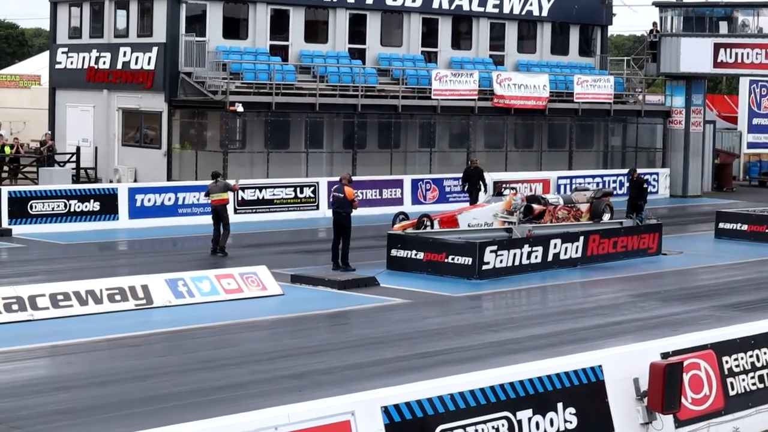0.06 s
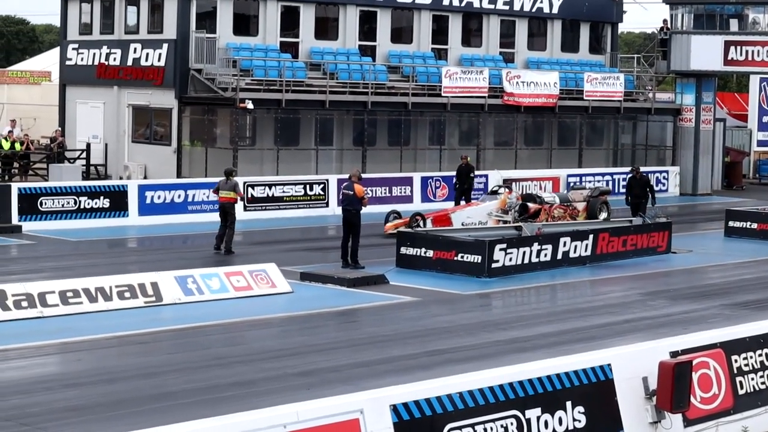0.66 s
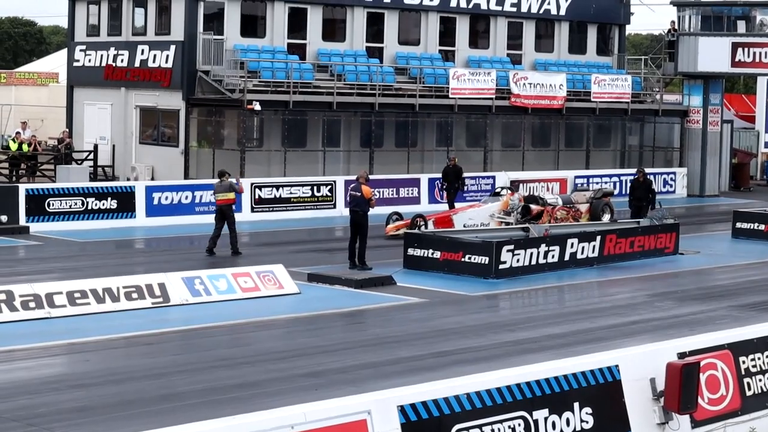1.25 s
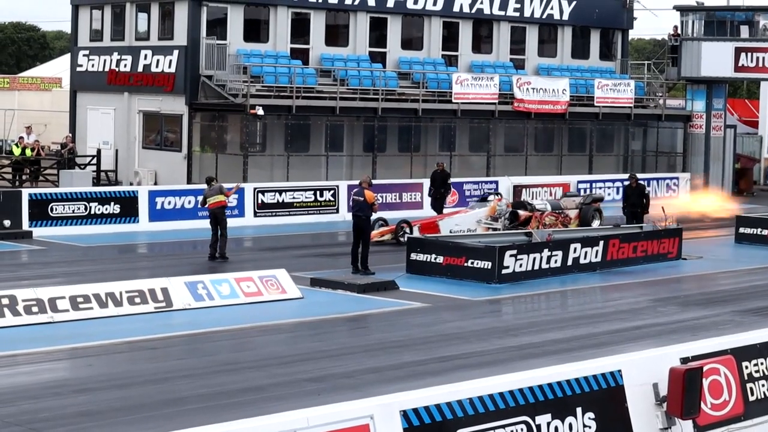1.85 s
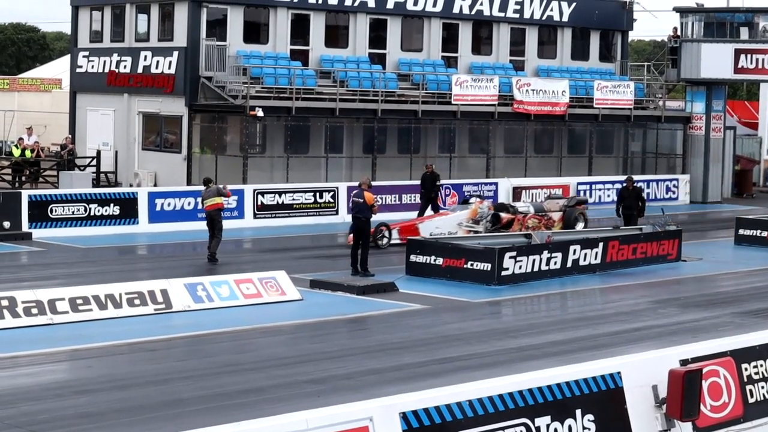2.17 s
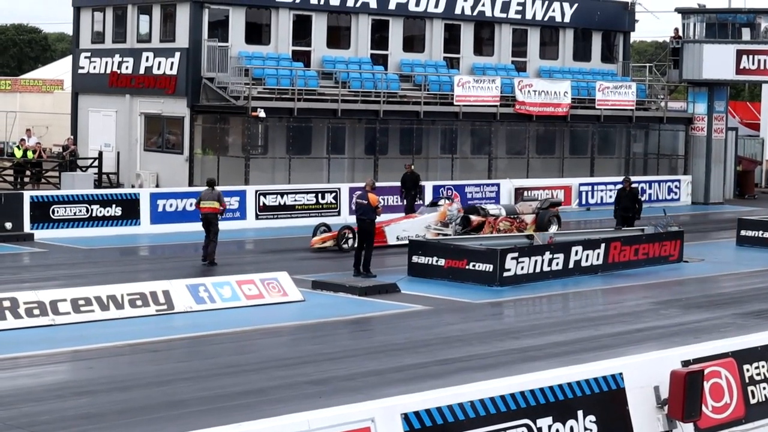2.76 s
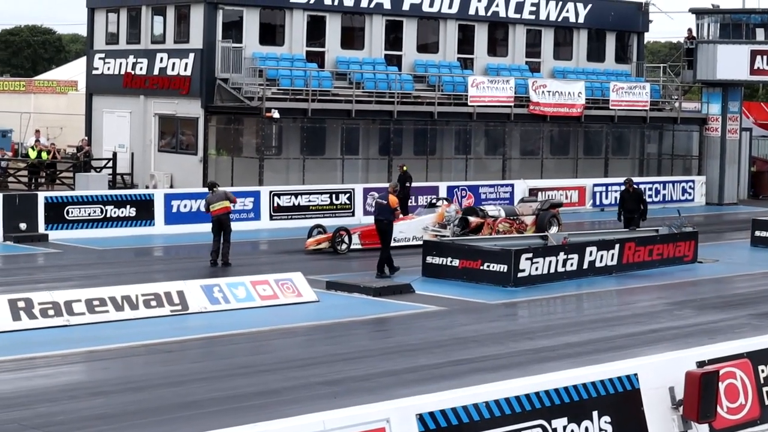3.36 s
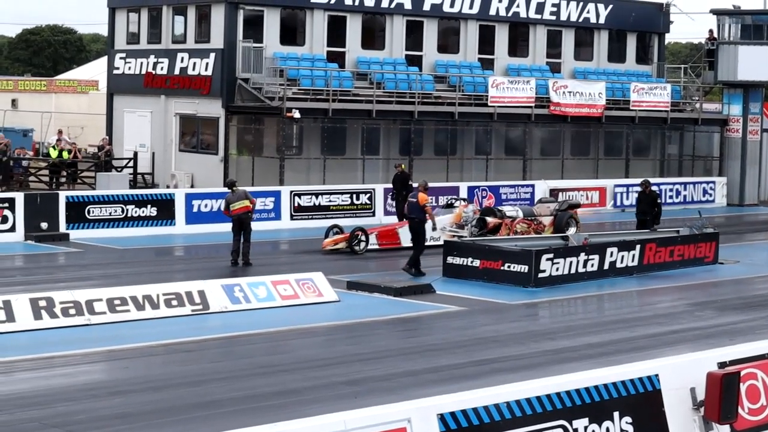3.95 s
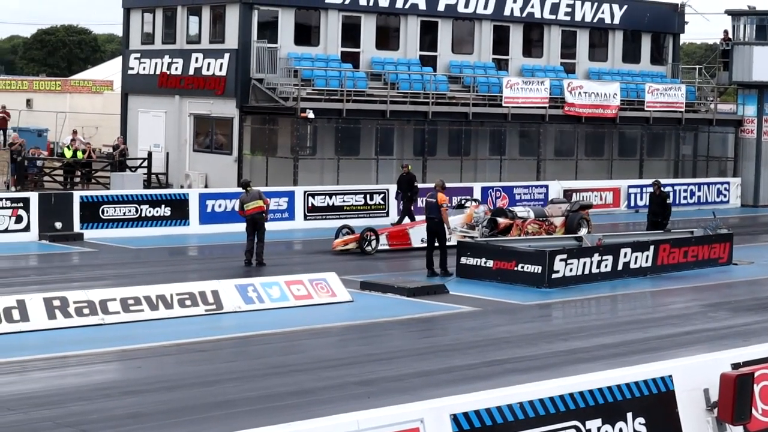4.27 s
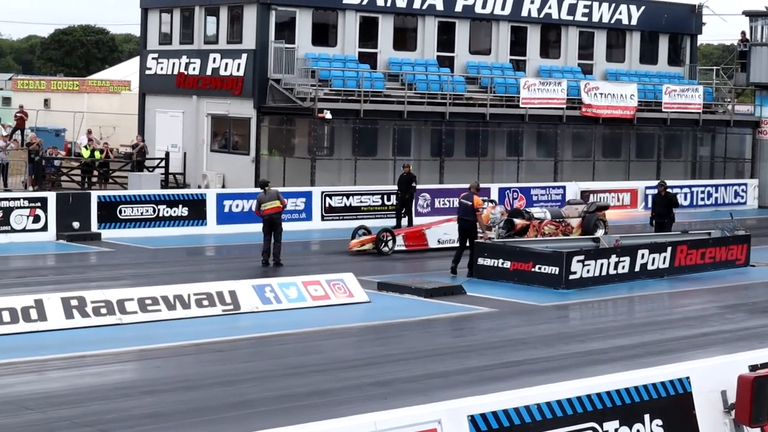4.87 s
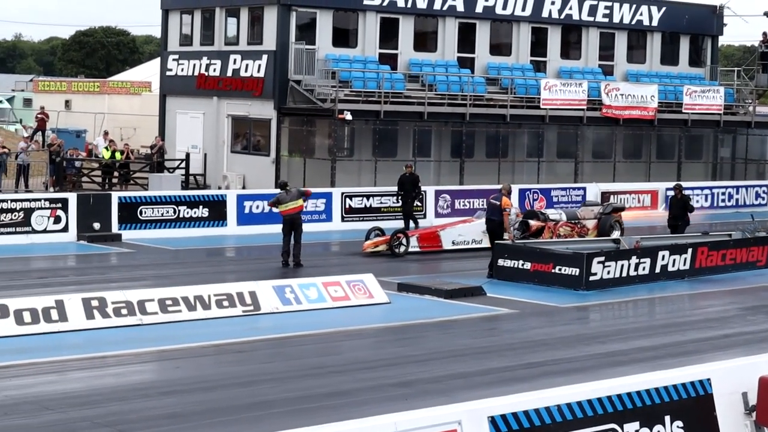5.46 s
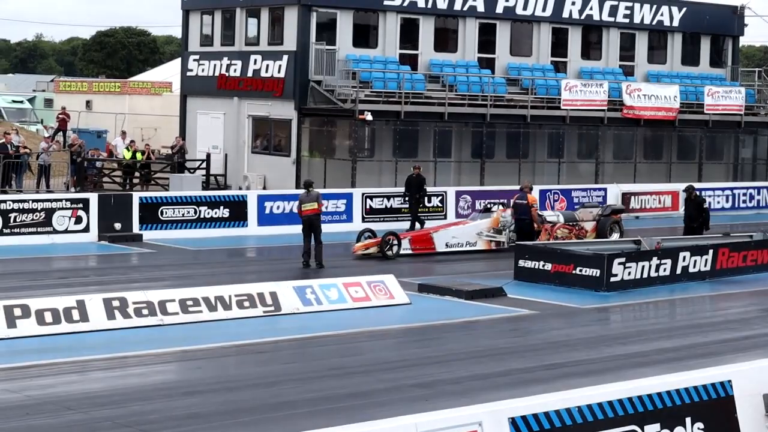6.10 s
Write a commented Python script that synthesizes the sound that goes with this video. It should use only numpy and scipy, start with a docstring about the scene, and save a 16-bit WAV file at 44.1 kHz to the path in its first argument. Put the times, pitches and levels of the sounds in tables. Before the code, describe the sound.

A jet engine whines over a low rumble while its afterburner fires in sudden pops and roars, dragging the pitch down each time.

```python
"""A jet dragster idles before a grandstand: blade tones whine over intake hiss and exhaust rumble as an
afterburner roar dies away. From 1 s, fuel lights in two short burns and a long one; each slows the shaft,
so the whine sinks and then recovers. After 3 s, air bumps softly against the microphone. Near 4, 5 and
5.5 s three more burns roar and crackle, lit with the hardest thumps, which the stand and far walls
reflect."""
import sys
import numpy as np
from scipy import signal
from scipy.fft import rfft, irfft, next_fast_len
from scipy.io import wavfile

SR = 44100
rng = np.random.default_rng(int(sys.argv[2]) if len(sys.argv) > 2 else 0)


def master(y):
    """Save y as 16-bit WAV."""
    cut = np.clip(np.atleast_2d(y).T, -1, 1)
    pcm = np.round(cut * 32767)  # scale
    wavfile.write(sys.argv[1], SR, pcm.astype(np.int16))


N = 270333
TIME = np.arange(N) / SR

# blade tone, swelling and fading in the moving air: (time [s], level [dB])
WHINE_LEVEL = [(0.0, -31.5), (0.38, -25.5), (0.68, -39), (0.95, -25), (1.07, -29), (1.09, -33.5),
               (1.74, -28), (1.91, -41), (2.01, -21), (2.06, -36), (2.94, -22), (2.97, -34), (3.16, -18),
               (3.19, -28.5), (3.31, -15), (3.74, -20.5), (3.86, -14), (4.22, -38.5), (4.4, -20),
               (4.61, -30), (4.68, -22), (4.8, -25), (4.9, -18.5), (5.07, -34.5), (5.36, -21),
               (5.46, -39.5), (5.57, -22.5), (5.86, -37.5), (6.06, -25.5), (6.13, -45)]
# overtones of the blade tone: (time [s], relative level [dB])
OVERTONE_LEVEL = [(0.03, -37), (0.06, -51), (0.4, -48.5), (0.72, -49), (0.81, -43), (1.31, -53),
                  (1.87, -49), (2.07, -53.5), (3.39, -39), (4.24, -48.5), (4.37, -42), (4.8, -45.5),
                  (4.88, -32), (5.05, -49), (5.61, -42.5), (6.1, -47.5)]
# inflow noise, which sets the hiss and the faint tones: (time [s], relative level [dB])
INFLOW_LEVEL = [(0.03, -43), (0.69, -47.5), (1.08, -40), (1.11, -47), (2.01, -44), (2.14, -48.5),
                (2.43, -42), (2.53, -46), (3.58, -38), (4.78, -41.5), (4.86, -36), (5.03, -41.5),
                (5.37, -41.5), (5.51, -44.5), (5.52, -38), (6.1, -42)]
# tones of uneven blades: (multiple of the shaft rate [1], level relative to the inflow [dB])
SHAFT_HARMONICS = [(9, -5.5), (15, -6), (17, -13), (19, -33), (21, -28), (31, -15), (33, -12.5), (36, -27),
                   (66, -31)]
# intake hiss: (frequency [Hz], relative spectral density [dB])
HISS_SPECTRUM = [(1200, -8.5), (2800, -2), (4300, 2), (5100, 2), (5850, -9), (6450, 0), (7050, -3.5),
                 (7750, -18), (8900, -13), (9900, -19.5), (10800, -13), (12600, -13), (14600, -13),
                 (15800, -29)]
# exhaust rumble: (time [s], level [dB])
EXHAUST_LEVEL = [(0, -36.5), (1.0, -30.5), (2.6, -33.5), (3.0, -34), (4.0, -29), (4.8, -31), (5.45, -33.5),
                 (6.13, -29.5)]
# exhaust rumble: (frequency [Hz], relative spectral density [dB])
EXHAUST_SPECTRUM = [(20, 0.5), (45, -1), (120, 5.5), (170, -0.5), (240, 4.5), (520, -2), (700, 0.5),
                    (1000, -4), (1500, -3), (2150, -1.5), (2550, -15), (5000, -48.5)]
# afterburner burns: (start [s], length [s], flame level [dB], nominal decay [dB/s], blade rate lost [Hz],
# flare [dB], flare delay [s], thump level [dB], crackle level [dB], jump of the whine [Hz])
AFTERBURNS = [(-.5, 0.52, -13, 81, 211.2, -16, .04, -14, -50, -23),
              (1.027, .085, -14, 43, 88.5, 3.5, .058, -11, -34, 13),
              (1.279, .085, -20, 48, 24.32, 5.5, 0.082, -39, -42, 12),
              (1.592, .8, -15, 90, 160.2, -1.5, 0.052, -11, -51, 55),
              (4.07, .075, -16.5, 47, 55.54, 0.5, 0.033, -0.5, -20, 155.5),
              (4.968, 0.084, -14.5, 47, 67, 2.5, .02, -2.5, -32, 121),
              (5.507, 0.59, -15.5, 53, 187.7, 2, .04, -7, -31, 35)]
# flame roar: (frequency [Hz], relative spectral density [dB])
FLAME_SPECTRUM = [(25, -36), (45, -20), (78, 0), (160, -2), (300, 1), (450, -3), (560, -6), (760, -5.5),
                  (1100, -12), (2200, -17), (2600, -25.5), (4000, -28.5), (7000, -43), (15000, -92)]
# crack of a blast front: (frequency [Hz], relative spectral density [dB])
CRACK_SPECTRUM = [(120, -15), (280, 21), (600, -6), (2200, -4), (2700, -19), (7000, -36), (15000, -42)]
# reflections from the face of the stand, its rising tiers, then far walls: (delay [s], gain [dB])
REFLECTIONS = [(.074, -.5), (.086, -7), (.098, -10), (.110, -6), (.122, -13), (.163, -14), (.254, -12),
               (.266, -12)]
# rasp of the flame front: (frequency [Hz], relative spectral density [dB])
CRACKLE_SPECTRUM = [(200, 5), (900, -8), (2000, 6), (2700, -0.5), (4000, -6), (6500, -18), (8500, -53),
                    (15000, -54)]
# air brushing the microphone: (time [s], level [dB], width [s])
GUSTS = [(3.254, -26, 0.015), (3.5, -49, 0.027)]
# bumps of air: (frequency [Hz], relative spectral density [dB])
GUST_SPECTRUM = [(25, -4), (55, -2), (120, -29), (400, -48), (4000, -68)]

BLADES, IDLE_HZ = 24, 4702   # blade count and blade passing frequency at idle
RECOVER_HZ_PER_S, EASE_HZ = 320, 68   # the climb back to idle, easing over the last stretch
FAST_CATCH_S, GENTLE_CATCH_S, HARD_THUMP_DB = 0.0058, 0.027, -7   # a harder thump means a fast catch
FLAME_SAG_DB_PER_S, FUEL_CUT_DB = 5.5, 1.66   # the flame weakens while fed and drops when the fuel stops
HEAT_JITTER_HZ = 45.7   # hot gas shakes the pitch of the whine, per unit of flame strength


def from_db(db):
    """Amplitude ratio: tenfold for every 20 dB."""
    return 10 ** (np.asarray(db) / 20)


def rms_one(x):
    """Normalisation to unit mean power."""
    return x / np.sqrt(np.mean(np.abs(x) ** 2) + 1e-20)


def in_time(curve):
    """Linear interpolation of a level curve at every sample."""
    return np.interp(TIME, *np.transpose(curve))


def swell(centre, width):
    """A Gaussian envelope; centre and width in seconds."""
    return np.exp(-.5 * ((TIME - centre) / width) ** 2)


def drift(rate_hz):
    """Random fluctuation of unit spread: noise twice through a one-pole low-pass, at an eighth of SR."""
    pole = np.exp(-16 * np.pi * rate_hz / SR)
    slow = signal.lfilter([1], [1, -2 * pole, pole * pole], rng.standard_normal(N // 8 + 4002))[4000:]
    return np.interp(np.arange(N) / 8, np.arange(len(slow)), rms_one(slow))


def scatter(width_hz):
    """Rayleigh fading: a tone arriving over many moving paths has random amplitude and phase."""
    return rms_one(drift(width_hz) + 1j * drift(width_hz))


def coloured(noise, spectrum):
    """Spectral shaping of a steady noise, at unit power."""
    size = next_fast_len(N)
    hz, db = np.transpose(spectrum)
    bins = np.maximum(np.arange(size // 2 + 1) * SR / size, 1)
    gain = from_db(np.interp(np.log(bins), np.log(hz), db)) * np.minimum(bins / hz[0], 1)
    return rms_one(irfft(rfft(noise, size) * gain, size)[:N])


def blade_rate():
    """Blade passing frequency follows shaft speed: each burn drags it down, then it climbs toward idle."""
    step_s = .005
    ticks = np.arange(AFTERBURNS[0][0], N / SR + step_s, step_s)
    drag = sum(lost_hz * np.clip((ticks - start) / length, 0, 1) ** .69   # steepest at first
               for start, length, _, _, lost_hz, *_ in AFTERBURNS)
    below_idle, rates = 0, []
    for pull in np.diff(drag, prepend=0):
        below_idle += pull if pull > 0 else -RECOVER_HZ_PER_S * step_s * np.tanh(below_idle / EASE_HZ)
        rates.append(IDLE_HZ - below_idle)
    return np.interp(TIME, ticks, rates)


def flame_strength(decay_scale):
    """Incoherent sources add in power: each burn catches, flares, sags while fed, then dies away."""
    power = np.zeros(N)
    for start, length, db, decay, _, flare_db, flare_delay, thump_db, *_ in AFTERBURNS:
        age = TIME - start
        catch = np.clip(age / (FAST_CATCH_S if thump_db > HARD_THUMP_DB else GENTLE_CATCH_S), 0, 1)
        lift_db = flare_db * swell(start + flare_delay, width=0.013)   # the gathered fuel burns off first
        sag_db = FLAME_SAG_DB_PER_S * np.clip(age, 0, length)
        die_db = FUEL_CUT_DB * (age > length) + decay_scale * decay * np.maximum(age - length, 0)
        power += (catch * from_db(db + lift_db - sag_db - die_db)) ** 2
    return np.sqrt(power)


def compressor_whine(inflow):
    """Periodic blade passage radiates a harmonic series; multipath scattering broadens each line."""
    whine_db = in_time(WHINE_LEVEL)
    overtone = from_db(in_time(OVERTONE_LEVEL) + 1.9 * drift(2.7))
    # the pressure wave of each ignition bends the pitch for an instant
    bend_hz = sum(jump_hz * swell(start, width=0.00453) for start, *_, jump_hz in AFTERBURNS)
    jitter_hz = 2 * drift(36) + HEAT_JITTER_HZ * flame_strength(decay_scale=0.57) * drift(47.6)
    phase = 2 * np.pi * np.cumsum(blade_rate() + bend_hz + jitter_hz) / SR
    turn = np.exp(1j * phase)
    # the weaker the direct tone, the deeper it fades and the more its reflections make it flutter
    diffuse = np.clip(from_db(-37 - whine_db), .08, .8)
    fading_db = (2.4 + 4 * diffuse) * np.tanh(drift(13))
    paths = np.sqrt(1 - diffuse ** 2) + diffuse * scatter(44)
    first = from_db(whine_db + 0.12 + fading_db) * paths + inflow * from_db(1) * scatter(130)
    second = overtone * (from_db(-0.5) * scatter(14.5) + from_db(-5.5) * scatter(89))
    third = overtone * from_db(-7) * scatter(12) + inflow * from_db(-12.5) * scatter(90)
    # swirl at the blade tips spreads a hump 170 Hz under the second harmonic
    second += inflow * from_db(-11.5) * scatter(220) * np.exp(-2j * np.pi * 170 * TIME)
    tones = first * turn + second * turn ** 2 + third * turn ** 3
    # no two blades are alike, so multiples of the shaft rate sound faintly and waver
    for multiple, db in SHAFT_HARMONICS:
        tones += inflow * from_db(db) * scatter(8.3) * np.exp(1j * phase * multiple / BLADES)
    return np.sqrt(2) * tones.real


def intake_hiss(inflow):
    """Amplitude modulation: a bright, breathy hiss wavers in level, with a quick flutter in the treble."""
    hiss = coloured(rng.standard_normal(N), HISS_SPECTRUM)
    treble = signal.sosfiltfilt(signal.butter(2, 8000, "high", fs=SR, output="sos"), hiss)
    wavering = (hiss - treble) * from_db(2 * drift(17)) + treble * from_db(2.4 * drift(26))
    return inflow * from_db(6.5) * wavering


def exhaust_rumble():
    """Jet noise: the idling exhaust radiates a continuous rumble of wavering level."""
    level_db = in_time(EXHAUST_LEVEL) + 2.06 * drift(5.9)
    return from_db(level_db) * coloured(rng.standard_normal(N), EXHAUST_SPECTRUM)


def fuel_pockets(per_s, spread_db):
    """Shot noise: pockets of fuel flare at random moments, a few much harder than the rest."""
    sizes = from_db(spread_db * np.minimum(rng.exponential(1, N), 4))
    lit = rng.random(N) < per_s / SR
    return rms_one(lit * sizes * rng.choice([-1, 1], N))


def flame_roar():
    """Combustion noise: dense, uneven flares in the afterburner merge into a roar."""
    flares = fuel_pockets(per_s=2000, spread_db=2.5) + .5 * rng.standard_normal(N)
    roar = from_db(0.8 * drift(16)) * coloured(flares, FLAME_SPECTRUM)
    return roar * flame_strength(decay_scale=0.88)


def ignition_cracks():
    """A steep pressure front is broadband: each blast cracks, and the stand and a far wall reflect it."""
    rise_s, decay_s, stand_delay = .001, .006, REFLECTIONS[0][0]
    strength = np.zeros(N)
    for start, *_, thump_db, _, _ in AFTERBURNS:
        for age in (TIME - start + .002, TIME - start - stand_delay):   # direct, then reflected
            strength += from_db(thump_db - 10) * np.clip(age / rise_s, 0, 1) * np.exp(-abs(age) / decay_s)
        strength += from_db(thump_db - 19) * swell(start + 0.165, width=0.022)   # smeared by the far wall
    return strength * coloured(rng.standard_normal(N), CRACK_SPECTRUM)


def blast(age, length_s, rise_s):
    """A blast wave: steep compression, then a longer rarefaction."""
    age = np.maximum(age, 0)
    front = 1 - np.exp(-age / rise_s)
    return front * np.cos(np.pi * age / length_s) * np.exp(-(age / (1.25 * length_s)) ** 4)


def ignition_thumps():
    """Delayed reflection: the tiers of the stand return each ignition's blast as a short low flutter."""
    pressure = np.zeros(N)
    for start, *_, thump_db, _, _ in AFTERBURNS:
        age = TIME - start
        pressure += from_db(thump_db) * blast(age, length_s=0.0083, rise_s=0.001)
        for delay, echo_db in REFLECTIONS:
            pressure += from_db(thump_db + echo_db) * blast(age - delay, length_s=0.0071, rise_s=0.0006)
    ragged = pressure * (1 + 0.14 * drift(370))
    return signal.sosfilt(signal.butter(2, 45, "high", fs=SR, output="sos"), ragged)


def flame_crackle():
    """Impulsive combustion noise: the flame front tears through the fuel cloud with a short bright rasp."""
    strength = sum(from_db(crackle_db) * swell(start + flare_delay, width=0.022) * (TIME > start)
                   for start, *_, flare_delay, _, crackle_db, _ in AFTERBURNS)
    return strength * coloured(fuel_pockets(per_s=3400, spread_db=7.5), CRACKLE_SPECTRUM)


def wind_bumps():
    """Pressure fluctuations of air brushing the microphone make soft low bumps."""
    strength = sum(from_db(db) * swell(centre, width) for centre, db, width in GUSTS)
    return strength * coloured(rng.standard_normal(N), GUST_SPECTRUM)


def scene():
    """Superposition: engine, afterburner and wind add in one channel, heard from across the track."""
    inflow = from_db(in_time(INFLOW_LEVEL))
    engine = compressor_whine(inflow) + intake_hiss(inflow) + exhaust_rumble()
    afterburner = flame_roar() + flame_crackle() + ignition_cracks() + ignition_thumps()
    return (engine + afterburner + wind_bumps())[None]


def record(dry):
    """Soft saturation rounds the highest peaks; a steep low-pass limits the bandwidth."""
    ceiling, cutoff_hz = .9, 15750
    rounded = dry / (1 + (dry / ceiling) ** 4) ** .25
    return signal.sosfilt(signal.ellip(12, .1, 90, cutoff_hz, fs=SR, output="sos"), rounded)


dry = scene()
out = record(dry)
master(out)
```